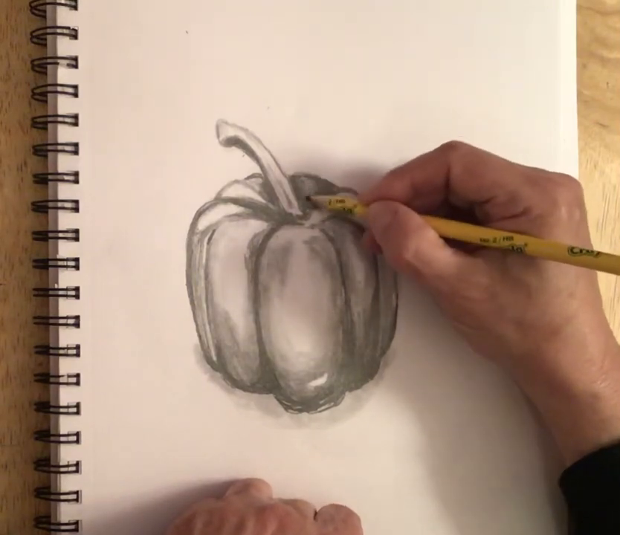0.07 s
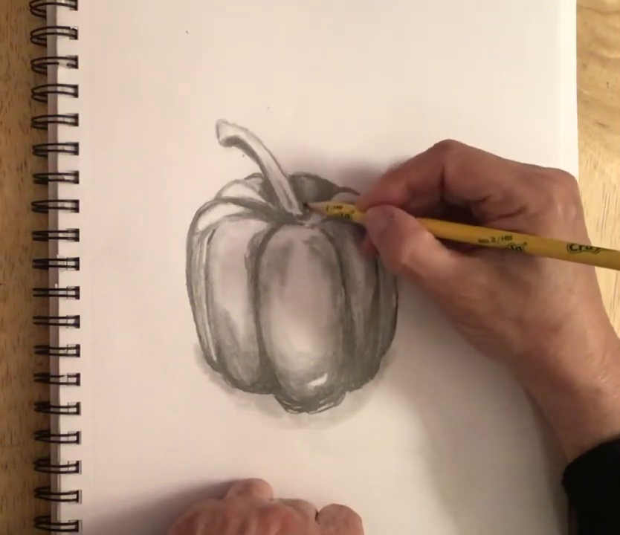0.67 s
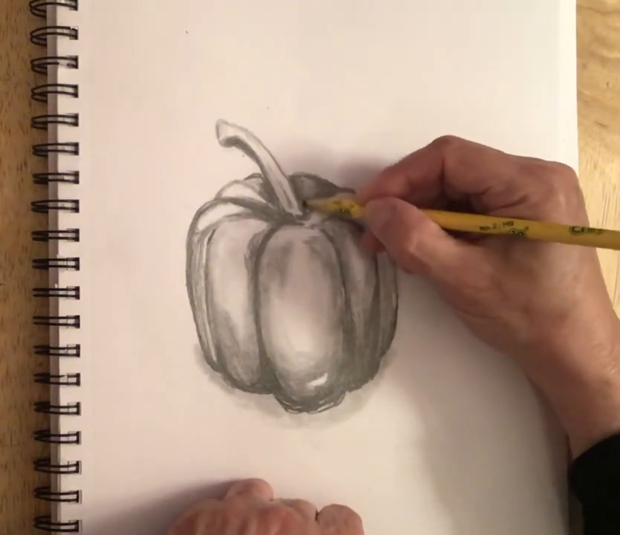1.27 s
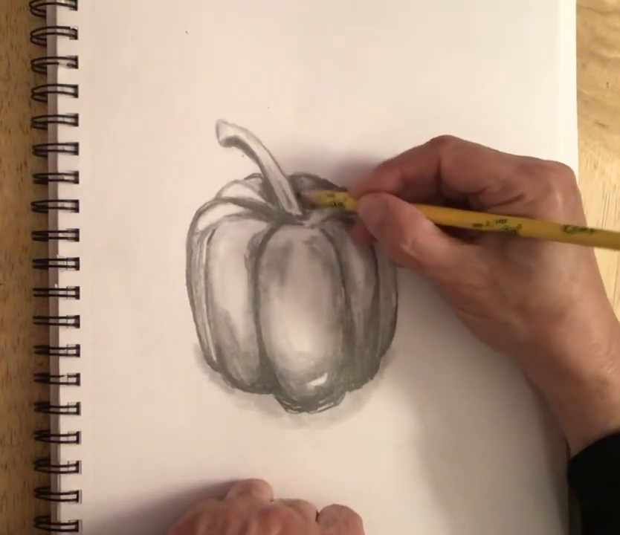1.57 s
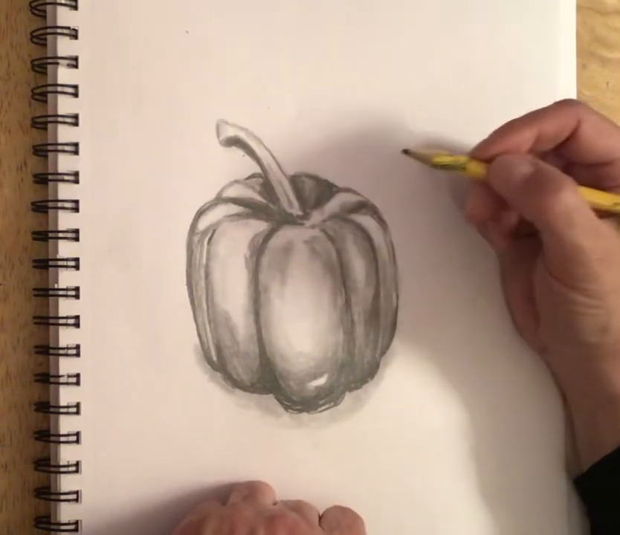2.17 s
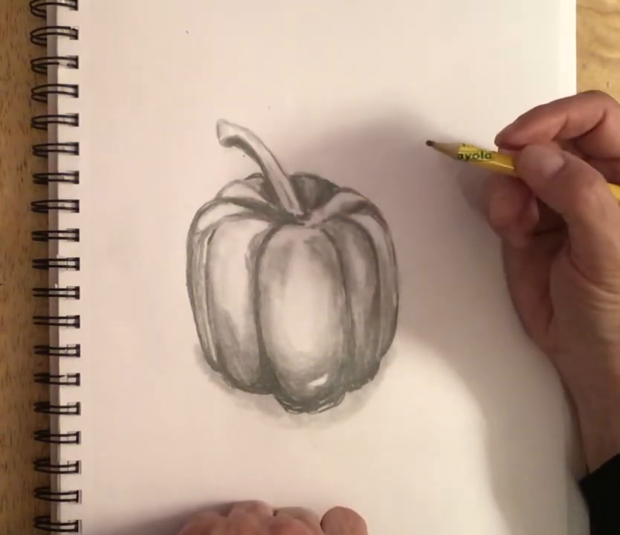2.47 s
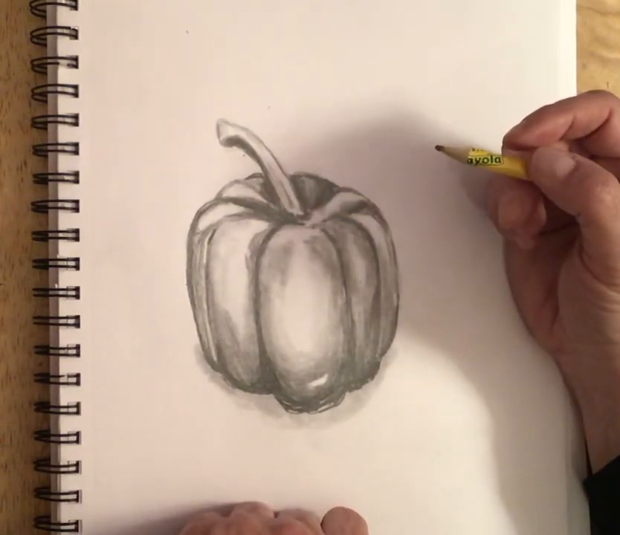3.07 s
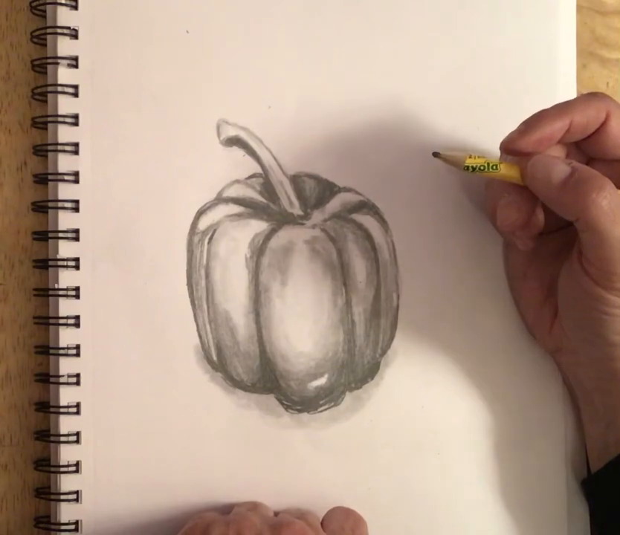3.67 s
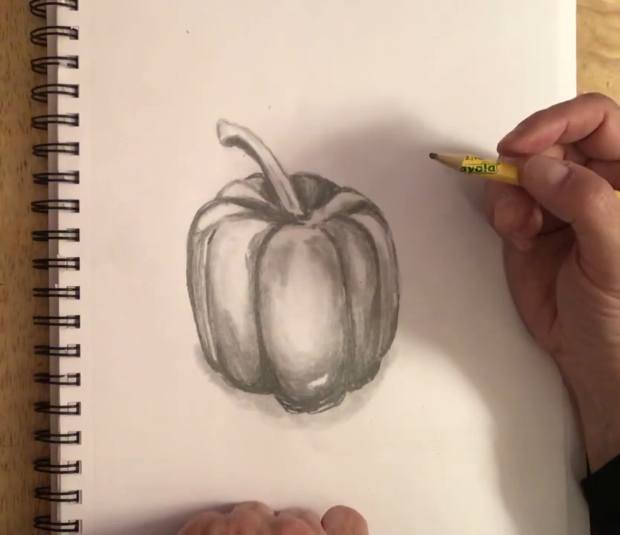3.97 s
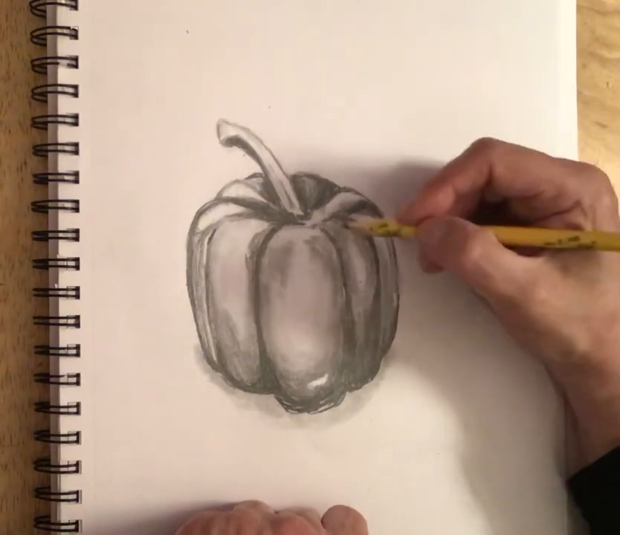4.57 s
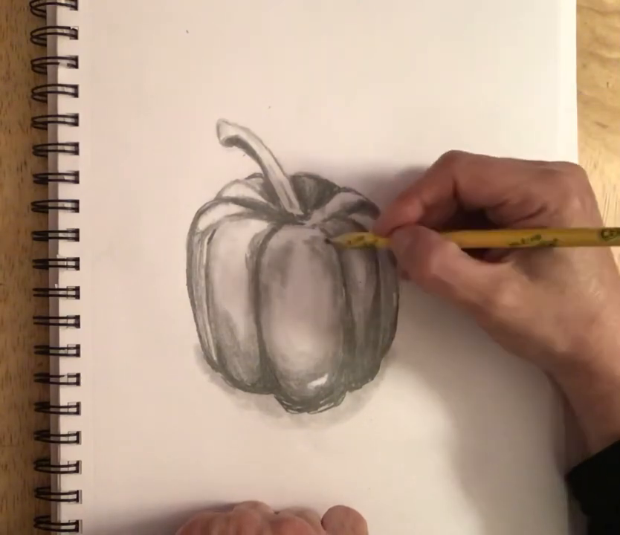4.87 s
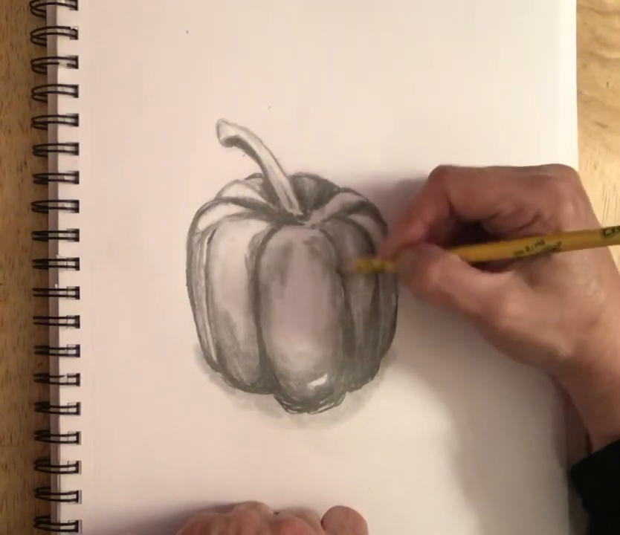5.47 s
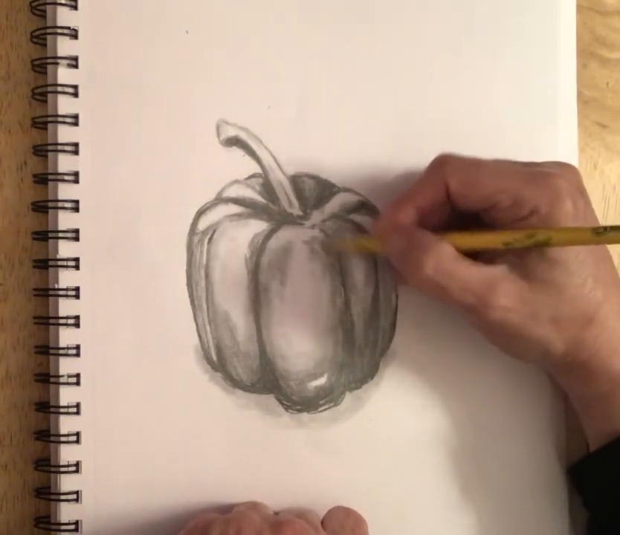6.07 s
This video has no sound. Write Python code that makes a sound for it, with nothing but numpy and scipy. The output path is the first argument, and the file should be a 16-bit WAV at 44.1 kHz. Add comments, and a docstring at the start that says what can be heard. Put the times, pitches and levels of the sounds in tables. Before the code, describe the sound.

A steady low appliance hum fills a room throughout, its tones beating slowly over a dull rush of air. A low, unevenly throbbing drone is there from the start and gradually fades. A faint, high whistle sounds for a moment in the first 0.3 seconds. Close by, a pencil barely brushes sketchbook paper in very faint, quick strokes during the first second. From about 1 to 1.9 seconds it makes a run of short, light, scratchy dabs. The pencil then stops, and only the hum and air remain until nearly 5 seconds. At about 5 seconds it returns with firmer, rapid back-and-forth shading, a dry, grainy, high rasp that is strongest near 5.3 seconds and continues to the end at about 6.3 seconds. The whole scene is quiet, with the pencil soft against the hum.

```python
"""A room where an appliance hums; close by, a pencil shades a drawing in a sketchbook.
Barely touching strokes and light dabs come first; the hand lifts, then returns with a firm to and fro.
The lead rasps over the tooth of the paper, and nearby surfaces throw the rasp back.
Motor, fan and mains tones beat slowly over a rush of air. A low drone fades throughout,
and a faint whistle sounds briefly at the start."""
import sys
import numpy as np
from scipy import signal
from scipy.fft import rfft, irfft
from scipy.io import wavfile
from scipy.ndimage import map_coordinates

SR = 44100
rng = np.random.default_rng(int(sys.argv[2]) if len(sys.argv) > 2 else 0)


def master(y):
    """Save y as 16-bit WAV."""
    cut = np.clip(np.atleast_2d(y).T, -1, 1)
    pcm = np.round(cut * 32767)  # scale
    wavfile.write(sys.argv[1], SR, pcm.astype(np.int16))


N = 278712
TIME = np.arange(N) / SR
BINS_HZ = np.fft.rfftfreq(N, 1 / SR)

# The appliance's hum. Each row: multiple of the turning or mains rate, relative level in dB.
MOTOR_HARMONICS = [(1, -45.5), (2, -51), (3, -67.5), (4, -67.5), (6, -77), (9, -76), (10, -71), (13, -85),
                   (19, -83.5), (21, -79.5), (31, -89.5), (37, -93), (39, -87), (43, -100)]
MAINS_HARMONICS = [(2, -56.5), (4, -59.5), (5, -66.5), (6, -67.5)]
FAN_HARMONICS = [(2, -70.5), (4, -65)]
# Its thin, steady whines. Each row: pitch in Hz, level in dB.
WHINE_TONES = [(522.6, -75.5), (932.5, -75.5), (2498, -94), (4183, -94.5), (4646, -100), (7316, -104),
               (9109, -104)]
# The dull slope of the rushing air. Each row: frequency in Hz, relative level in dB.
AIR_SLOPE = [(20.0, -17), (40.0, -13), (65.0, 0), (125.0, 0.5), (240.0, 0.8), (320.0, -10.5), (600.0, -6.5),
             (830.0, -9.5), (1050.0, -20.5), (1400.0, -22.5), (2500.0, -26.5), (5000.0, -35), (9000.0, -45),
             (11000.0, -48), (15400.0, -50.5)]
# Resonances and dips of casing and room. Each row: centre in Hz, width in Hz, boost or cut in dB.
AIR_RESONANCES = [(73.3, 3.9, 6), (80, 6.2, -7.5), (95.4, 5.5, -6), (124, 11, 4), (174, 10.2, 6.5),
                  (208.5, 12, 4.5), (288.8, 25.2, 9.5), (381, 56, 5.5), (470, 15, -3.5), (494, 32, 5.5),
                  (613, 18, -2.5), (631, 31, 1.5), (744, 16, -3.5), (797, 18, 3), (913, 17, -2),
                  (1180, 65, 6), (1630, 69, 3), (3770, 150, 2.5), (6690, 82, 6), (7100, 70, 1.5),
                  (9150, 190, 6.5)]
# How hard the hand presses in each spell of shading. Each row: time in seconds, relative level in dB.
LIGHT_TOUCH = [(0.0, -84), (.35, -89), (.6, -85), (.75, -91), (1.02, -87)]
FIRM_TOUCH = [(4.86, -84), (4.95, -85), (5.0, -69), (5.28, -66), (5.82, -70.5), (6.07, -69), (6.32, -70.5)]
# The rasp's resonances at two spots on the page. Each row: centre in Hz, width in Hz, weight in dB.
LIGHT_COLOUR = [(4530, 1800, -5.5), (7260, 3100, -7.3), (8300, 660.0, -3), (9900, 320, -4.5),
                (10800, 780, -4), (11910.0, 510.0, -8.0), (13480.0, 1490.0, -4.3), (14500, 640.0, -6),
                (15620.0, 690, -2.5)]
FIRM_COLOUR = [(3320, 1900, -5), (5300, 1000, -0.5), (6210, 620, -3), (7200.0, 1150.0, -9.5),
               (7970, 1140, -1.5), (9250.0, 440, -6), (10030.0, 1100, -4.5), (11050, 440.0, -3.5),
               (12260, 1680.0, -4.8), (13700, 620, 1), (14500, 1700, -1.5)]
# Early reflections off desk, hand and wall. Each row: delay in seconds, gain in dB.
SURFACE_ECHOES = [(.0017, -10.5), (.0031, -15), (.0046, -11), (.0095, -19)]
# Single dabs of the lead. Each row: midpoint in seconds, length in seconds, relative level in dB.
LEAD_DABS = [(.665, .075, -85), (1.063, .075, -81), (1.17, .085, -76.5), (1.24, 0.071, -74.5),
             (1.363, 0.065, -70.5), (1.443, .105, -78), (1.553, .066, -71.5), (1.635, .085, -79),
             (1.738, .07, -78.5), (1.812, .075, -77.5)]


def gain_of(db):
    """Decibels to amplitude."""
    return 10 ** (np.asarray(db) / 20)


def unit_rms(x):
    """Scales to rms 1."""
    return x / np.sqrt(np.mean(x ** 2) + 1e-30)


def noise(gain):
    """Noise of rms 1, coloured by a gain for each frequency."""
    return unit_rms(irfft(rfft(rng.standard_normal(N)) * gain, N))


def drift(rate_hz):
    """Smooth random modulation of rms 1 that rolls off above the rate."""
    return noise(np.exp(-(BINS_HZ / rate_hz) ** 2))


def tone(hz, db, wander_rad):
    """A sine whose phase wanders gently."""
    phase = 2 * np.pi * (hz * TIME + rng.random()) + wander_rad * drift(3.5)
    return np.sqrt(2) * gain_of(db) * np.sin(phase)


def harmonics(rate_hz, partials, trim_db, wander_rad, flutter_db):
    """The stacked tones of one slightly unsteady rotation or mains cycle."""
    angle = 2 * np.pi * rate_hz * TIME + wander_rad * drift(1.5)
    tones = sum(gain_of(db) * np.sin(k * angle + 2 * np.pi * rng.random()) for k, db in partials)
    return np.sqrt(2) * tones * gain_of(trim_db + flutter_db * drift(4.5))


def appliance_hum():
    """Motor and fan slip a little behind the mains, so their tones beat against it."""
    motor = harmonics(58.075, MOTOR_HARMONICS, trim_db=0, wander_rad=.023, flutter_db=.43)
    mains = harmonics(59.95, MAINS_HARMONICS, trim_db=-.5, wander_rad=.016, flutter_db=.4)
    fan = harmonics(57.08, FAN_HARMONICS, trim_db=-2, wander_rad=.045, flutter_db=0)
    whines = sum(tone(hz, db, wander_rad=.88) for hz, db in WHINE_TONES)
    return motor + mains + fan + whines


def air_rush(level_db=-51.5, waver_db=.51):
    """A dull bed of moving air, made hollow by the resonances of casing and room."""
    hz, db = np.transpose(AIR_SLOPE)
    slope_db = np.interp(np.log(BINS_HZ + 1), np.log(hz), db)
    lift_db = sum(lift * np.exp(-.5 * (2 * (BINS_HZ - centre) / width) ** 2)
                  for centre, width, lift in AIR_RESONANCES)
    return noise(gain_of(slope_db + lift_db)) * gain_of(level_db + waver_db * drift(16))


def drone(hz=293.7, start_db=-52, fade_db_per_s=2.5, throb_db=2.5):
    """A low tone throbs unevenly as it dies away."""
    return tone(hz, start_db - fade_db_per_s * TIME + throb_db * drift(3.1), wander_rad=.35)


def shading(touch, turn_s, swell, swing_s=.177, out_share=.57, fastest_at=.57, turn_speed=.1):
    """The friction envelope of a swinging wrist: two passes a swing, almost at rest at each turn."""
    swing_phase = (TIME - turn_s) / swing_s % 1
    pass_phase = np.interp(swing_phase, [0, out_share, 1], [0, 1, 2]) % 1
    travel = np.interp(pass_phase, [0, fastest_at, 1], [0, .5, 1])
    speed = np.hypot(np.sin(np.pi * travel), turn_speed)
    pressure_db = np.interp(TIME, *np.transpose(touch), left=-np.inf, right=-np.inf)
    return gain_of(pressure_db) * speed ** swell


def pencil_rasp(force, colour, trim_db, grip_db, grain_db, peak_fibres_per_s, contrast):
    """The lead snaps over paper fibres, which ring pencil and page."""
    # A faster lead meets more fibres, each of its own size.
    speed = .25 + .75 * np.sqrt(force / force.max())
    caught = rng.random(N) < speed * peak_fibres_per_s / SR
    snaps = caught * rng.standard_normal(N) * gain_of(grain_db * np.minimum(rng.exponential(1, N), 4))
    # The grip varies with the tooth of the paper.
    grip = gain_of(trim_db + grip_db * drift(140))
    friction = unit_rms(snaps / np.sqrt(speed)) * force * grip
    power = sum(gain_of(db) ** 2 / (1 + (2 * (BINS_HZ - hz) / width) ** 2) ** 2
                for hz, width, db in colour)
    # Contrast above 1 deepens the valleys between the resonances.
    response = unit_rms(np.sqrt(power) ** contrast)
    return irfft(rfft(friction) * response, N)


def near_surfaces(rasp, sway_s=.00003):
    """Adds short echoes whose paths shift as the hand moves, giving each pass its own colour."""
    mix = rasp.copy()
    for delay_s, db in SURFACE_ECHOES:
        source_s = TIME - delay_s - sway_s * drift(3)
        mix += gain_of(db) * map_coordinates(rasp, [source_s * SR], order=3)
    return mix


def whistle(hz=1181, level_db=-62.5, start_s=.053, rise_s=.04, hold_s=.07, fade_db_per_s=170):
    """A faint, high tone swells, holds for a moment and dies away."""
    age = TIME - start_s
    attack = np.clip(age / rise_s, 0, 1)
    fade_db = fade_db_per_s * np.maximum(age - rise_s - hold_s, 0)
    return attack * tone(hz, level_db - fade_db, wander_rad=.57)


def dabbing(swell=1.15):
    """The friction envelope of separate dabs: each swells and stops in one arch."""
    force = np.zeros(N)
    for middle_s, length_s, db in LEAD_DABS:
        progress = np.clip((TIME - middle_s) / length_s + .5, 0, 1)
        force += gain_of(db) * np.sin(np.pi * progress).clip(0) ** swell
    return force


def scene():
    """Two spells of pencil work, light then firm, over the room tone."""
    light_force = shading(LIGHT_TOUCH, turn_s=.0043, swell=1.1) + dabbing()
    firm_force = shading(FIRM_TOUCH, turn_s=5.04, swell=.88)
    light = pencil_rasp(light_force, LIGHT_COLOUR, trim_db=.7, grip_db=1.8, grain_db=-1.5,
                        peak_fibres_per_s=22000, contrast=1.2)
    firm = pencil_rasp(firm_force, FIRM_COLOUR, trim_db=.6, grip_db=1.84, grain_db=.5,
                       peak_fibres_per_s=20000, contrast=1.14)
    return (near_surfaces(light + firm) + appliance_hum() + drone() + whistle() + air_rush())[None]


def record(dry, cutoff_hz=15720):
    """A steep low-pass takes off the very top."""
    lowpass = signal.firwin(1023, cutoff_hz, window=("kaiser", 9), fs=SR)
    return signal.oaconvolve(dry, lowpass[None], "same")


dry = scene()
out = record(dry)
master(out)
```